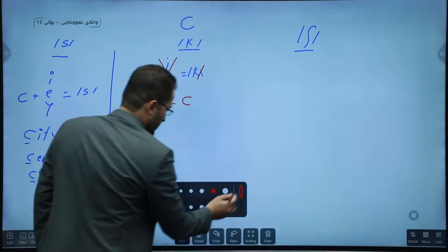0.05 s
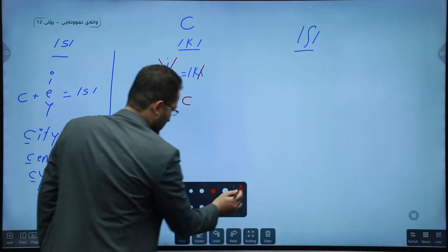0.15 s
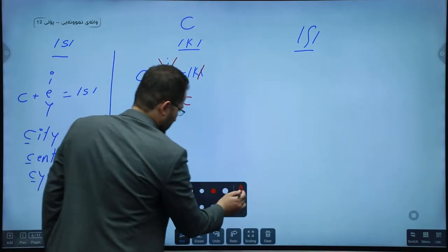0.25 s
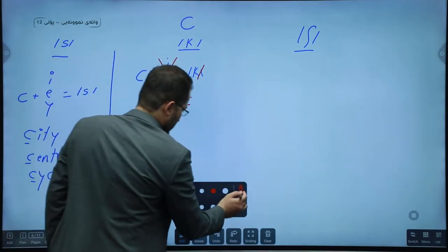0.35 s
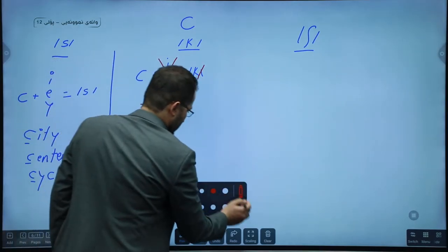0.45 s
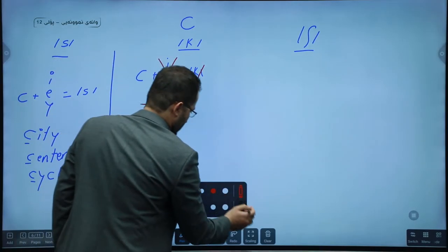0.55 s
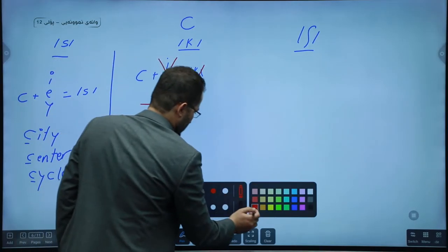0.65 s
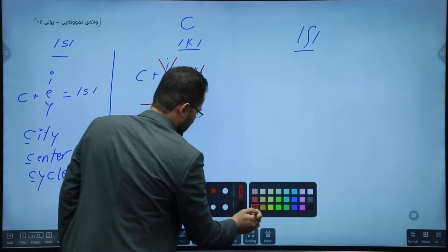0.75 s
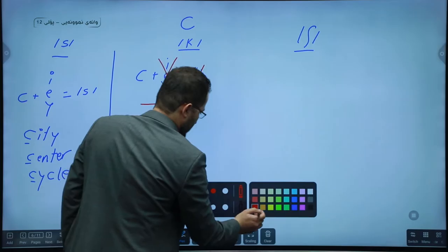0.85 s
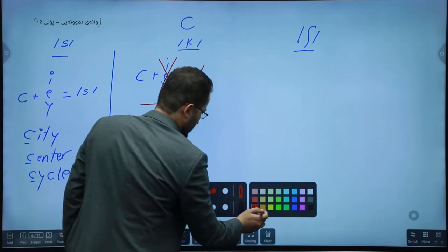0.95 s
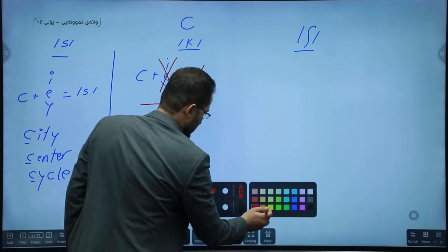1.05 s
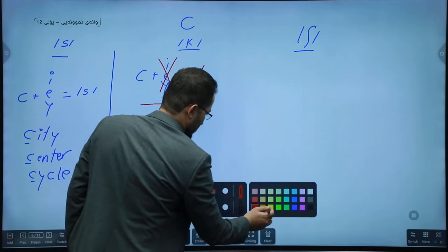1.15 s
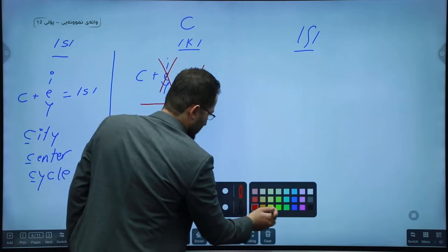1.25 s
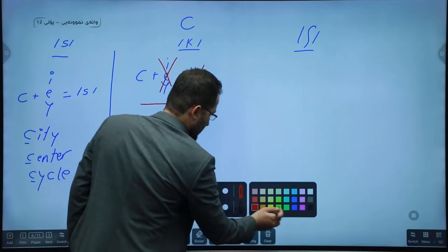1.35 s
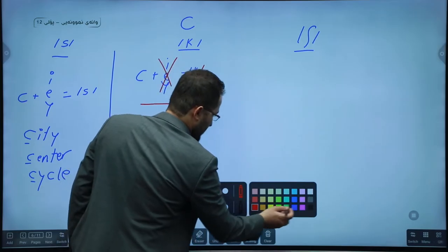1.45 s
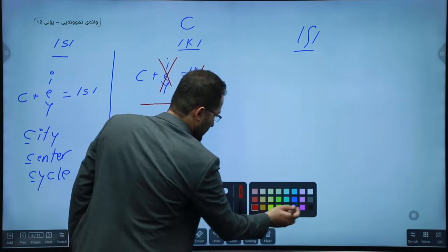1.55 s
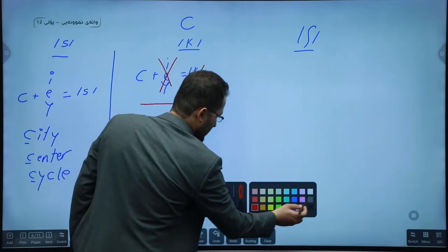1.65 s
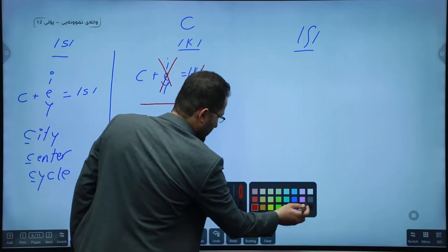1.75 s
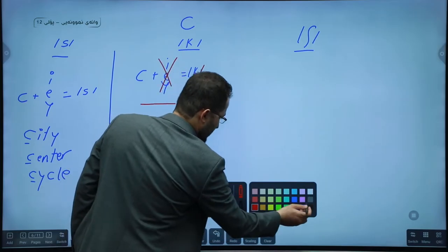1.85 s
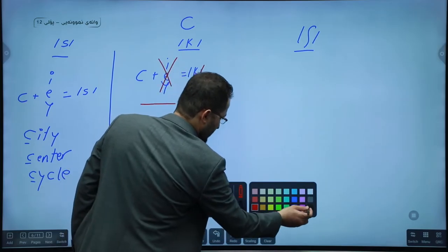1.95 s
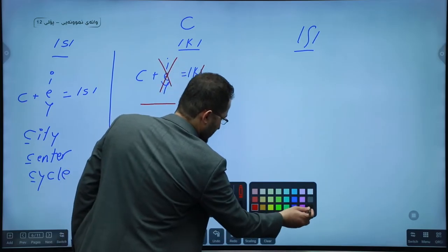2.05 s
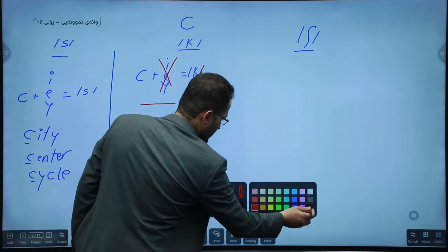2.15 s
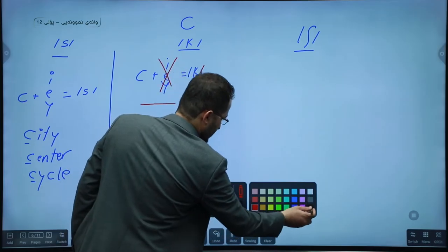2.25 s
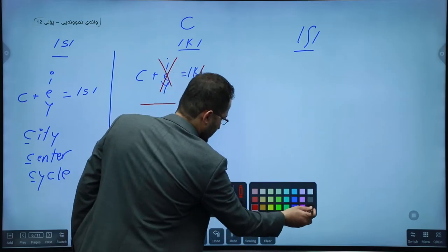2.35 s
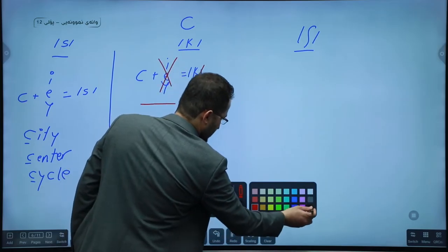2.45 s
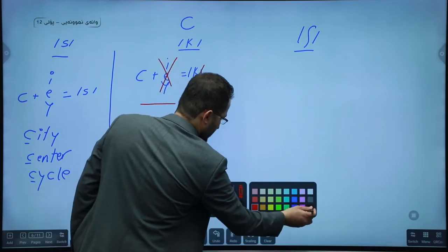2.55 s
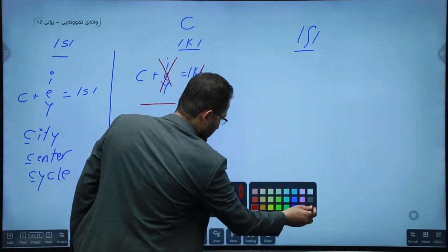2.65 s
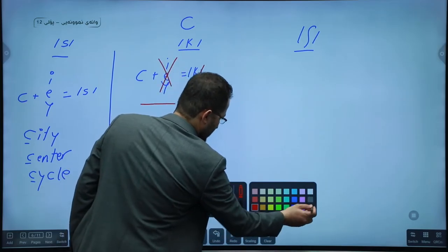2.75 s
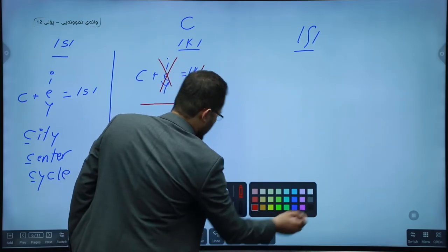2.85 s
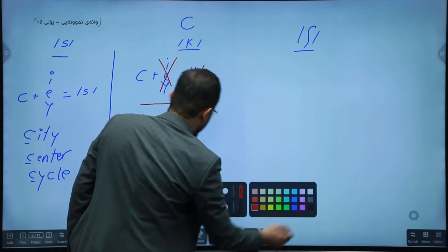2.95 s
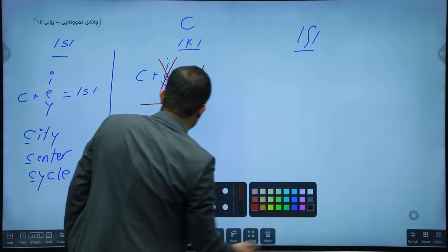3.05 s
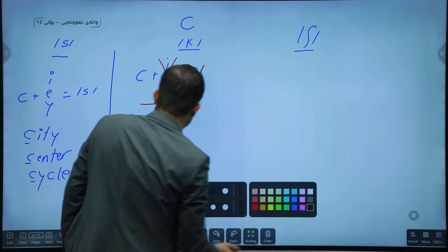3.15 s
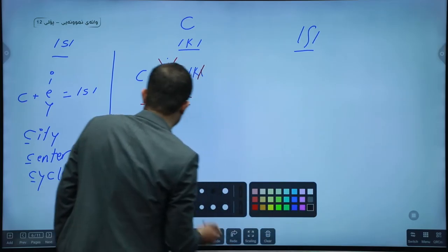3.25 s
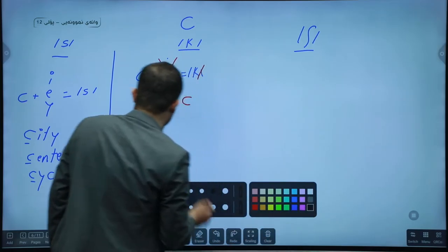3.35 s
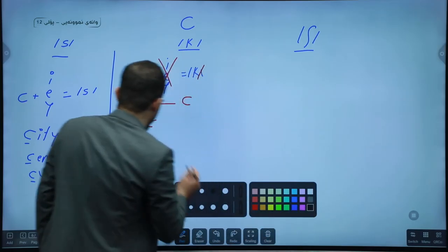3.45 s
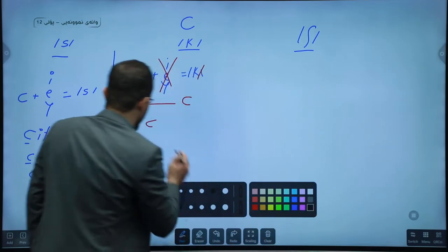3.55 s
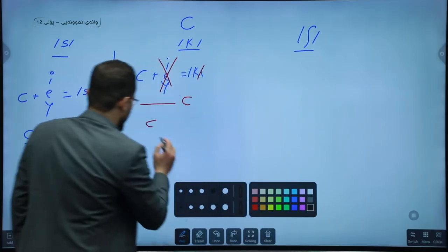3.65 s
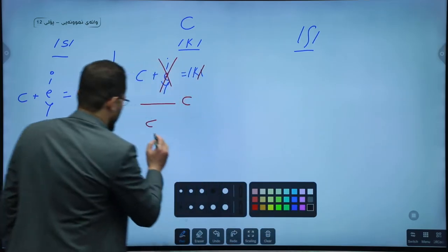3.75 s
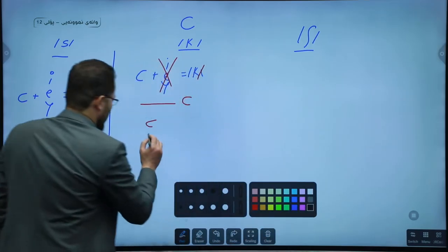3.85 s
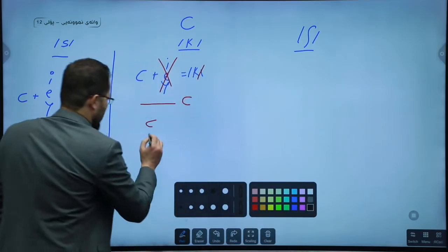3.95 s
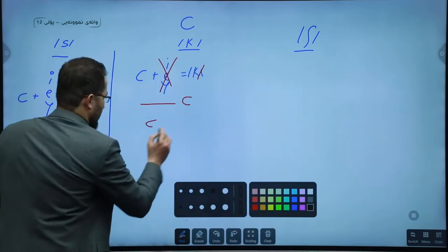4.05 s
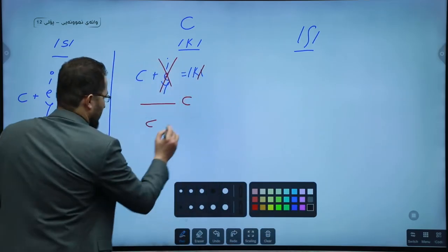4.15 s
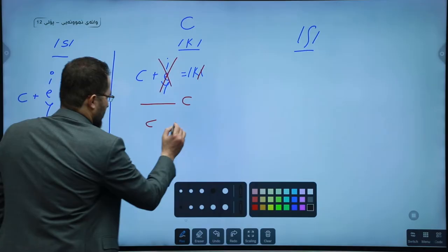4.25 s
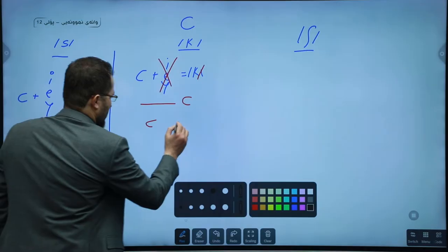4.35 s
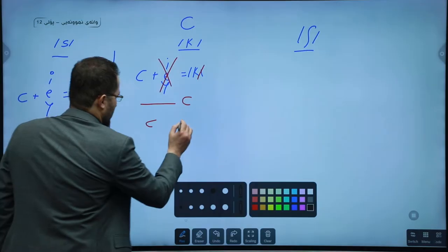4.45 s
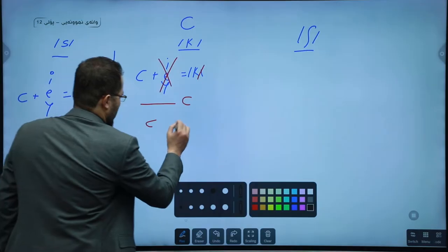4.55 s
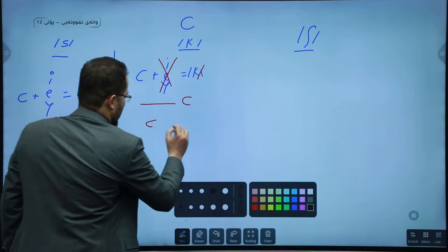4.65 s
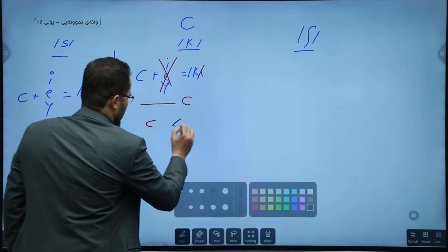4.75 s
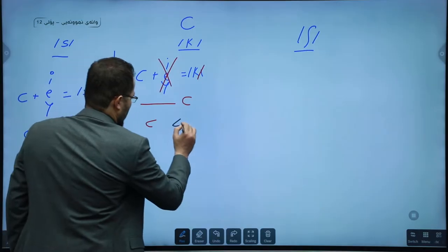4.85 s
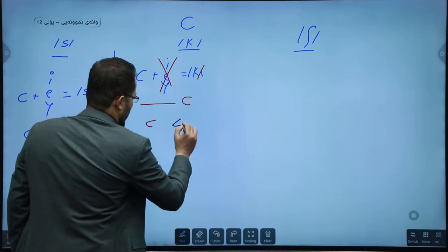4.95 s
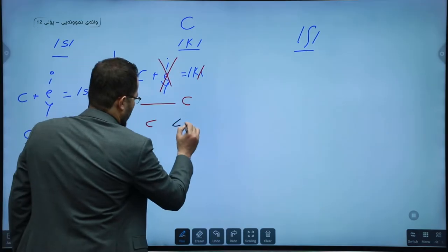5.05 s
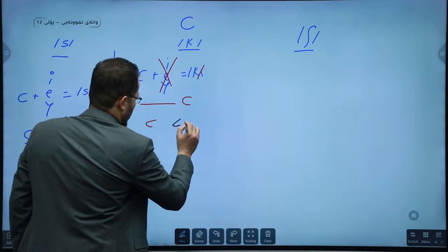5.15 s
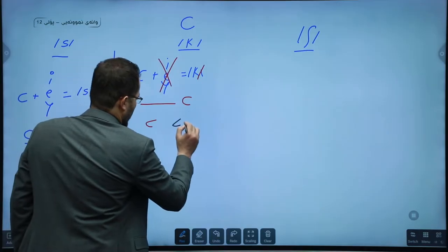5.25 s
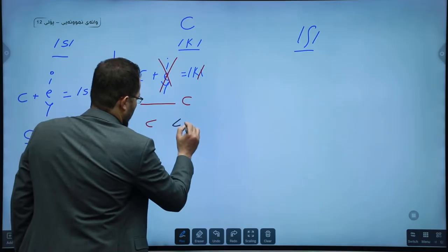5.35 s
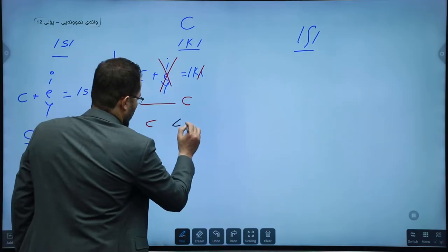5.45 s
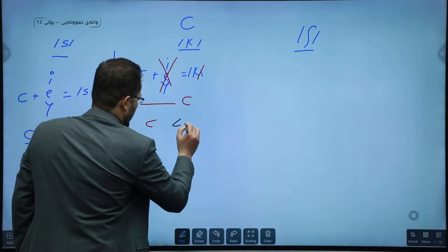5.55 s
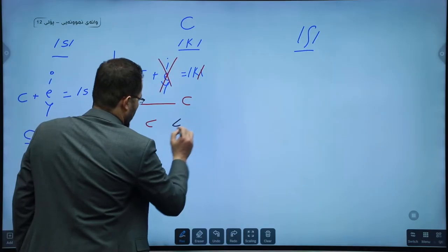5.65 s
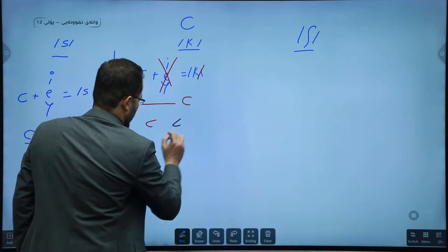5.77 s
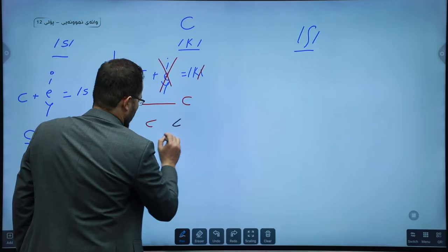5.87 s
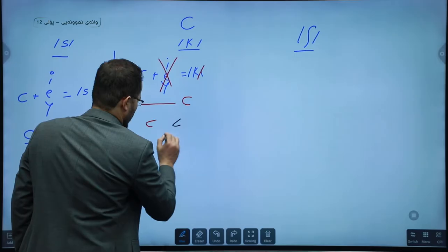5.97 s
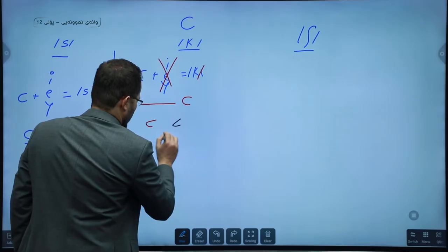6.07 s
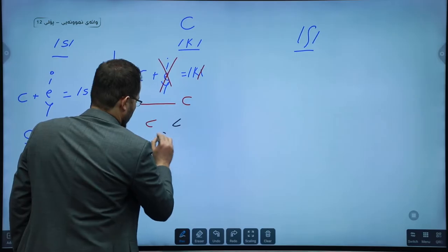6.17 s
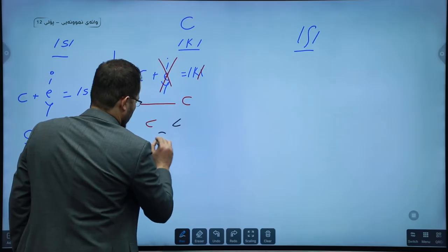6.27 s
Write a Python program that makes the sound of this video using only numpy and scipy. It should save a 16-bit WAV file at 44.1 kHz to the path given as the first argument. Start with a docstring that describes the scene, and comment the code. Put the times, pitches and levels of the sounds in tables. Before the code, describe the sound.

Four isolated taps of a hard pen tip on a big mounted glass panel, loud to very soft, spread over about six seconds. Each is a short woody thump with a small tick and a brief boxy echo. Light shoe and cloth rubbing comes after the second tap, followed by barely audible tones and a distant horn. A distant stereo microphone pair hears low traffic and even hiss in a quiet classroom.

```python
"""Four knocks, each softer than the last, land on a large wall-mounted touch screen in a quiet classroom.
Each is a tick of the stylus tip, a short decaying thump, ringing modes of panel and room, and echoing noise.
Banded, grainy noise makes the shoe scuffs as the writer shifts; sine tones and upper harmonics make faint
tones and a far horn. Wandering noise gives traffic bass and murmur, and each channel hisses on its own."""
import sys
import numpy as np
from scipy import signal
from scipy.fft import rfft, irfft
from scipy.io import wavfile
from scipy.ndimage import uniform_filter1d

SR = 44100
rng = np.random.default_rng(int(sys.argv[2]) if len(sys.argv) > 2 else 0)


def to_wav(s):
    """Save 16-bit WAV."""
    ch = np.atleast_2d(s).T  # columns
    pcm = np.round(np.clip(ch, -1, 1) * 32767)  # PCM
    wavfile.write(sys.argv[1], SR, pcm.astype(np.int16))


N = 278271
T = np.arange(N) / SR  # seconds

# Traffic bass through the walls. Each row: time in seconds, level in dB.
BASS_LEVEL = [(0, -58), (1.2, -59.5), (3.5, -59), (4, -55.5), (4.8, -59), (5.7, -55), (6.31, -56)]
# Colour of the bass. Each row: frequency in Hz, relative density in dB per Hz.
BASS_COLOUR = [(12, -58), (20, -9), (32, -31.5), (59, -7), (69, -10.5), (87, -0.5), (118, -8.5),
               (151, -7.5), (252, -11.5), (276, -18), (500, -25.5), (650, -51), (1100, -120)]
# Murmur above the bass. Each row: time in seconds, level in dB.
MURMUR_LEVEL = [(0, -65), (.6, -68.5), (1.5, -67.5), (2.4, -70), (4, -65), (5.2, -70), (5.9, -65.5),
                (6.31, -68.5)]
# Colour of the murmur. Each row: frequency in Hz, relative density in dB per Hz.
MURMUR_COLOUR = [(300, -10.5), (600, 2.5), (1000, 1.5), (1400, -3), (2500, -7), (5000, -11), (10000, -17)]
# Colour of the hiss. Each row: frequency in Hz, relative density in dB per Hz.
HISS_COLOUR = [(12, -43), (20, -10), (145, -7.5), (283, -5), (334, -3.5), (840, -4), (913, -4.5),
               (2560, -4.5), (3200, -4), (15700, -5.5)]
# The four knocks. Each row: start in seconds, then gains in dB of thump, tip tick, tick sheen, knock edge,
# wall echo, echo tail, tail mids and tail treble, and last the flutter depth from 0 to 1.
KNOCKS = [(.2572, -11.5, -32, -1, -21.5, -17, -37.5, 4.5, 4.5, 0.08),
          (2.6533, -18, -34.5, -2.5, -29, -2.5, -41.5, -0.5, 1.5, 0.06),
          (4.5559, -21.5, -41, -6, -28.5, -7, -47.5, -4, 0, 0.32),
          (6.0752, -27, -59, -10, -41, -14, -51.5, -9, -13, 0.17)]
# Colour of the tip tick. Each row: frequency in Hz, width of each filter pass in Hz, gain in dB.
TICK_BANDS = [(3110, 2200, -0.5), (5000, 250, 10), (6600, 630, -2), (8700, 1400, -0.5)]
# Modes of panel and room. Each row: frequency in Hz, 60 dB decay in seconds, level in dB for each of four spots.
PANEL_MODES = [(114.3, 0.71, -52, -61, -51, -56), (138.7, 0.49, -31, -49, -35.5, -38),
               (157.4, 0.97, -37.5, -41.5, -47, -46), (186.5, 0.38, -32.5, -38, -34.5, -37.5),
               (216.4, 1, -49, -34.5, -40.5, -41), (248, 0.84, -36, -38, -35.5, -38),
               (264.4, 0.69, -28, -35.5, -41, -42.5), (300.4, 0.69, -47, -34, -52, -59),
               (308.3, 0.27, -29.5, -37.5, -37, -48), (334, 0.43, -31.5, -37, -43.5, -41.5),
               (365, 0.32, -37, -48, -35, -40), (385.3, 0.55, -42, -41, -41.5, -47),
               (423.5, 0.39, -30.5, -36.5, -41.5, -44), (439.7, 0.18, -37, -37, -40, -46),
               (502, 0.25, -44, -51, -44.5, -61), (518, 0.19, -26, -45, -45, -54),
               (553, 0.36, -35, -44, -46, -51), (601, 0.43, -38, -35.0, -45, -50),
               (628, 0.31, -31, -36.0, -43.5, -47), (667, 0.38, -36, -43, -54, -58),
               (689, 0.3, -38, -37, -43.5, -64), (745, 0.25, -42, -38.5, -43.5, -56),
               (826, 0.2, -43, -46, -64, -68), (895, 0.7, -52, -52.5, -61, -66),
               (914, 0.37, -37.5, -52, -53, -64), (972, 0.64, -45, -59, -69, -84),
               (1074, 0.46, -60, -64, -68, -79), (1110, 0.67, -55, -68, -75, -82),
               (1294, 0.16, -53, -75, -65, -64)]
# Diffuse echo tail. Each row: frequency in Hz, relative level in dB, 60 dB decay in seconds.
ECHO_BANDS = [(122.5, -6.5, 1), (265, 7, 0.74), (520, 2.5, 0.52), (845, -14, 0.94), (1480, -30, 0.43),
              (2330, -22.5, 0.39), (3950, -21.5, 0.28), (6500, -30, 0.16), (10900, -20, 0.082)]
# Faint tones. Each row: start in seconds, end in seconds, first pitch in Hz, upward glide in Hz, level in dB.
TONES = [(1.368, 1.53, 1680, 30, -76.5), (5.24, 5.342, 253, 6, -61.5), (5.48, 5.588, 250.4, 5, -60.5),
         (5.82, 6.5, 113.5, 2.5, -52.5)]
# Shoes and cloth rubbing. Each row: full pressure in seconds, hold in seconds, then levels in dB
# of low body, high body and airy treble.
SCUFFS = [(3.022, 0.17, -72.5, -73, -69), (3.47, 0.22, -69, -76, -72.5), (3.973, 0.053, -54.5, -54, -59.5),
          (4.13, 0.037, -68, -73.5, -77)]
# Low body, high body and treble of the sole; higher parts speak later.
# Each row: frequency in Hz, width of each filter pass in Hz, lag in seconds.
SOLE_BANDS = [(720, 670, 0.001), (2100, 1280, .015), (3620, 5800, .03)]
# Small clicks of grit. Each row: start in seconds, level in dB, frequency in Hz.
GRIT = [(3.681, -61, 1500), (3.882, -53, 2200), (4.131, -60, 900), (4.215, -50.5, 800)]
# Upper harmonics of the far horn. Each entry: harmonic number, level in dB.
HORN_HARMONICS = {7: -78, 8: -76.5, 10: -82}

THUMP_HZ, THUMP_ONSET_S, WALL_DELAY_S = 556, 0.00021, 0.0118
CLICK_S, CLICK_DB, CHATTER_DB = 0.0006, 13.5, 2  # first contact of the tip, then its chatter
SHEEN_HZ, SHEEN_WIDTH_HZ = 12800, 5300
EDGE_HZ, EDGE_WIDTH_HZ = 1350, 1520
BUILD_CYCLES, ECHO_BUILD_S = 1.4, 0.0017  # time constants
FLUTTER_S, FLUTTER_PEAK_S = 0.0458, 0.014  # round trip between facing walls, first swell after the blow
SCUFF_RISE_DB_PER_S, SCUFF_FALL_DB_PER_S = 116, 116
HORN_START_S, HORN_END_S, HORN_HZ = 4.70, 4.88, 293
HISS_DB, SHARED_HISS_DB = -63, -7  # the shared part is relative to each channel's own
TOP_HZ = 15750


def undb(db):
    """Turn dB into a gain factor."""
    return 10 ** (np.asarray(db) / 20)


def unit(x):
    """Scale to rms 1."""
    return x / np.sqrt(np.mean(x ** 2))


def band(x, hz, width_hz):
    """Two-pole resonance, gain 1 at the centre."""
    return signal.lfilter(*signal.iirpeak(hz, hz / width_hz, fs=SR), x)


def steep(x, hz, width_hz):
    """The same resonance twice, for dark skirts."""
    return band(band(x, hz, width_hz), hz, width_hz)


def coloured(points):
    """Noise of rms 1, its spectrum joining (Hz, dB) points on a log-frequency axis."""
    hz, db = np.transpose(points)
    f = np.maximum(np.arange(N // 2 + 1) * SR / N, 1)
    gain = undb(np.interp(np.log(f), np.log(hz), db))
    return unit(irfft(rfft(rng.standard_normal(N)) * gain, N))


def walk(rate):
    """Wandering level of rms 1: random values held 1 / rate seconds and smoothed twice."""
    hold = int(SR / rate)
    steps = np.repeat(rng.standard_normal(N // hold + 1), hold)
    return unit(uniform_filter1d(uniform_filter1d(steps, hold), hold)[:N])


def curve(points):
    """Straight lines between (s, value) points."""
    return np.interp(T, *np.transpose(points))


def fade(t, t60):
    """Decay by 60 dB in t60 seconds."""
    return undb(-60 * t / t60)


def add(out, s, x):
    """Mix x into out from time s."""
    i = int(s * SR)
    out[i:i + len(x)] += x[:len(out) - i]


def traffic_bass():
    """Low noise through the walls, wandering gently in level."""
    return undb(curve(BASS_LEVEL) + 0.49 * walk(4.95)) * coloured(BASS_COLOUR)


def murmur():
    """Noise from outside, strongest in the mids and wandering in level."""
    colour = [(150, -34)] + MURMUR_COLOUR  # thin out the lows
    return undb(curve(MURMUR_LEVEL) + 0.5 * walk(8.0)) * coloured(colour)


def panel_thump(t):
    """The glass first yields, then springs back harder."""
    swing = -np.sin(2 * np.pi * THUMP_HZ * t) * np.exp(-((t * THUMP_HZ - 0.62) / 0.56) ** 2)
    return swing * (1 - np.exp(-t / THUMP_ONSET_S))


def mount_sway(t):
    """The whole screen sways on its mount as a fast-decaying 50 Hz sine."""
    return undb(-29.5) * np.sin(2 * np.pi * 50 * t) * fade(t, 0.22)


def tip_contact(t):
    """The tip clicks once and chatters for about a millisecond; nearby edges scatter it a little longer."""
    chatter = undb(CHATTER_DB) * np.exp(-((t - 0.0010) / 0.0005) ** 2)
    scatter = undb(-12) * (t > 0.001) * fade(t, 0.054)
    burst = np.sign(rng.standard_normal(len(t))) * (chatter + scatter)
    burst[int(CLICK_S * SR)] -= undb(CLICK_DB)
    return burst


def tip_tick(burst, sheen_db):
    """The hard tip's contact heard through bright resonances, with a sheen on top."""
    tick = sum(undb(db) * steep(burst, hz, width) for hz, width, db in TICK_BANDS)
    return tick + undb(sheen_db) * steep(burst, SHEEN_HZ, SHEEN_WIDTH_HZ)


def ring(t, spot):
    """Decaying modes of panel and room; each needs a few cycles to build up, so low ones rise slower."""
    hz, t60, db = (np.array(PANEL_MODES)[:, c, None] for c in (0, 1, 2 + spot))
    phase = 2 * np.pi * rng.random((len(PANEL_MODES), 1))
    rise = 1 - np.exp(-t * hz / BUILD_CYCLES)
    modes = undb(db) * rise * fade(t, t60) * np.sin(2 * np.pi * hz * t + phase)
    return np.sum(modes, axis=0)


def echoes(t, mids_db, treble_db):
    """Dense wall echoes; each band dies at its own rate, a soft blow has less treble."""
    out = 0
    for hz, db, t60 in ECHO_BANDS:
        noise = unit(steep(rng.standard_normal(len(t)), hz, 0.59 * hz))
        blow_db = 0 if hz < 700 else mids_db if hz < 2000 else treble_db
        out = out + undb(db + blow_db) * fade(t, t60) * noise
    return out * (1 - np.exp(-t / ECHO_BUILD_S))


def knocks():
    """Each blow sounds thump, tick and edge, then a wall echo of the thump, over ring and echo tail."""
    out, t = np.zeros(N), np.arange(int(1.2 * SR)) / SR
    for spot, row in enumerate(KNOCKS):
        s, thump_db, tick_db, sheen_db, edge_db, wall_db, echo_db, mids_db, treble_db, depth = row
        thump = panel_thump(t)
        burst = tip_contact(t)
        add(out, s, undb(thump_db) * (thump + mount_sway(t)))
        add(out, s, undb(tick_db) * tip_tick(burst, sheen_db))
        add(out, s, undb(edge_db) * steep(burst, EDGE_HZ, EDGE_WIDTH_HZ))
        add(out, s + WALL_DELAY_S, undb(thump_db + wall_db) * thump)
        # sound shuttling between facing walls makes the tail throb
        flutter = 1 + depth * np.cos(2 * np.pi * (t - FLUTTER_PEAK_S) / FLUTTER_S)
        tail = ring(t, spot) + undb(echo_db) * echoes(t, mids_db, treble_db)
        add(out, s, flutter * tail)
    return out


def swelling_tones(rows):
    """Sines that swell in and out; any glide starts slowly and ends fast."""
    out = np.zeros(N)
    for start, end, hz, glide_hz, db in rows:
        t = np.arange(int((end - start) * SR)) / SR
        cycles = hz * t + glide_hz * t ** 3 / (3 * t[-1] ** 2)
        swell = np.sin(np.pi * t / t[-1]).clip(0) ** 0.62
        add(out, start, undb(db) * np.sqrt(2) * swell * np.sin(2 * np.pi * cycles))
    return out


def faint_tones():
    """Thin tones from outside, each a single sine gliding slightly upward."""
    return swelling_tones(TONES)


def scuffs():
    """Grainy rubbing heard through two bodies of the sole and an airy treble."""
    grain, out = undb(1.2 * walk(90)), 0
    for k, (hz, width, lag) in enumerate(SOLE_BANDS):
        level = 0
        for s, hold, *peak_db in SCUFFS:
            t = T - s - lag
            rise_db = SCUFF_RISE_DB_PER_S * (-t).clip(0)
            fall_db = SCUFF_FALL_DB_PER_S * (t - hold).clip(0)
            level = level + undb(peak_db[k] - rise_db - fall_db)
        out = out + level * unit(steep(grain * rng.standard_normal(N), hz, width))
    return out


def grit():
    """Bits of grit click in the scuff as short, banded bursts of noise."""
    out, t = np.zeros(N), np.arange(int(0.04 * SR)) / SR
    for s, db, hz in GRIT:
        noise = unit(steep(rng.standard_normal(len(t)), hz, hz))
        add(out, s, undb(db) * noise * fade(t, 0.027))
    return out


def far_horn():
    """A short far horn of which only a few upper harmonics are heard."""
    return swelling_tones([(HORN_START_S, HORN_END_S, k * HORN_HZ, 0, db) for k, db in HORN_HARMONICS.items()])


def scene():
    """Everything is far enough to reach both microphones alike."""
    outside = traffic_bass() + murmur()
    mono = outside + knocks() + faint_tones() + scuffs() + grit() + far_horn()
    return np.tile(mono, (2, 1))


def record(dry):
    """Each channel adds its own hiss, a weaker part is common to both; the top is cut steeply."""
    own = np.array([coloured(HISS_COLOUR), coloured(HISS_COLOUR)])
    shared = undb(SHARED_HISS_DB) * coloured(HISS_COLOUR)
    hiss = undb(HISS_DB) * (own + shared)
    top_cut = signal.ellip(10, 0.2, 60, TOP_HZ, fs=SR, output="sos")
    return signal.sosfilt(top_cut, dry + hiss)


dry = scene()
out = record(dry)
to_wav(out)
```